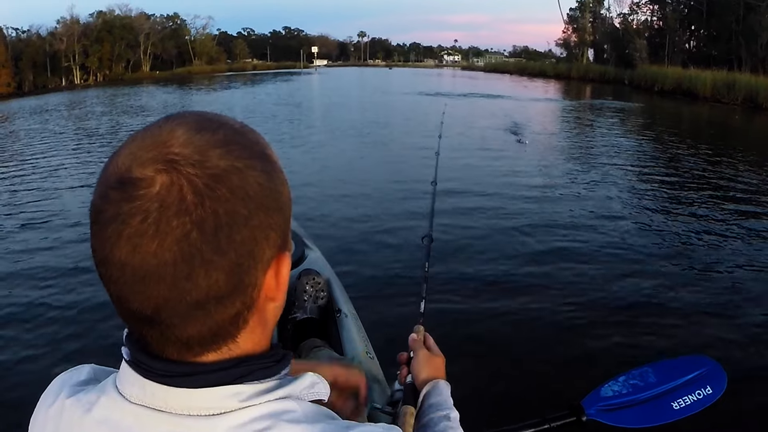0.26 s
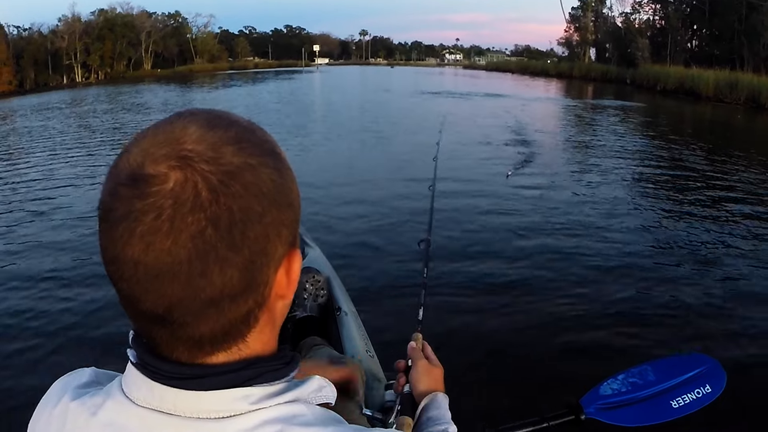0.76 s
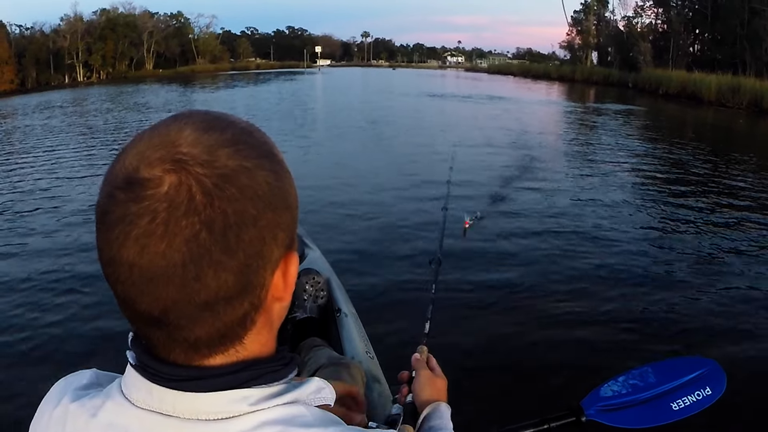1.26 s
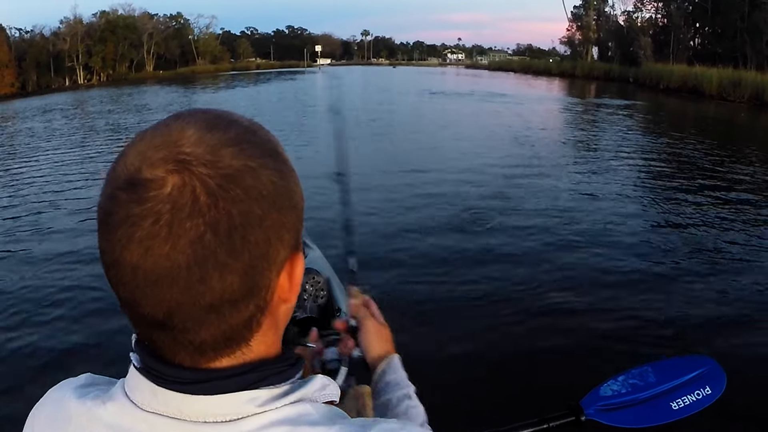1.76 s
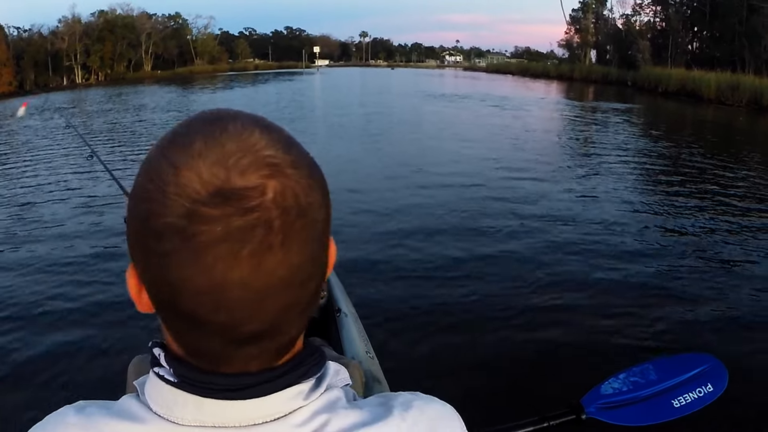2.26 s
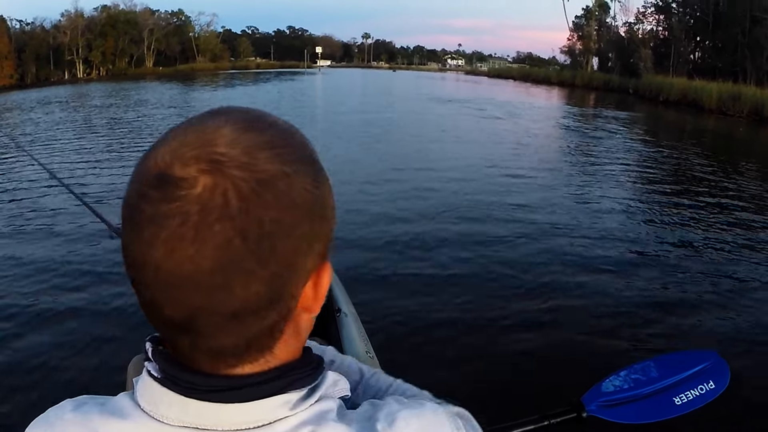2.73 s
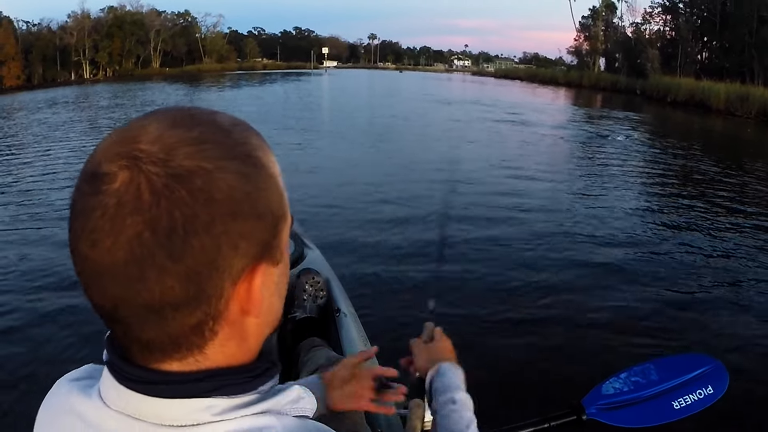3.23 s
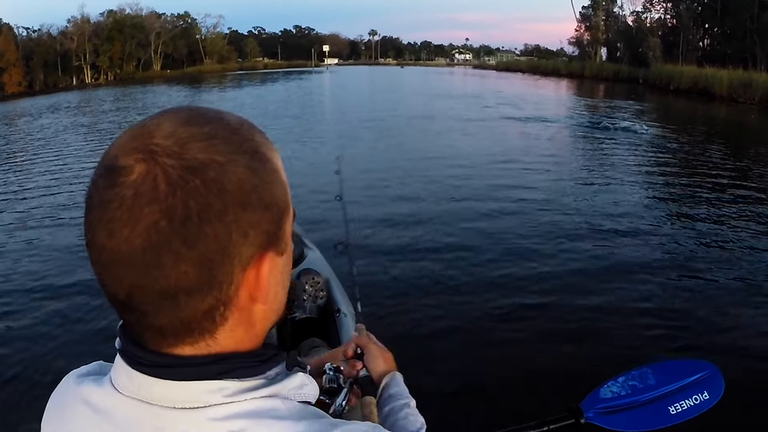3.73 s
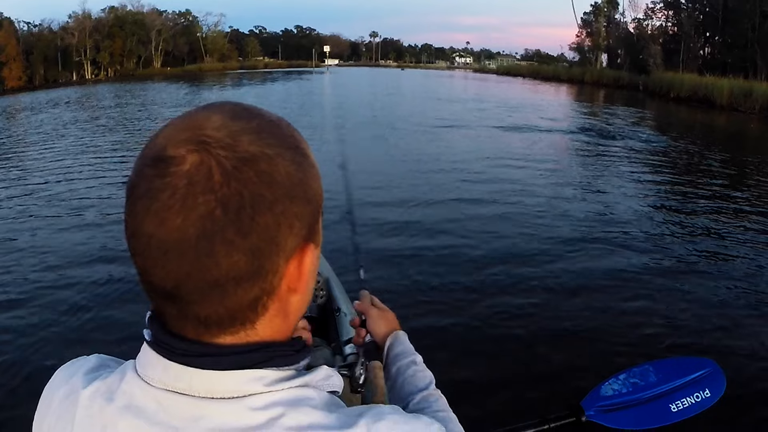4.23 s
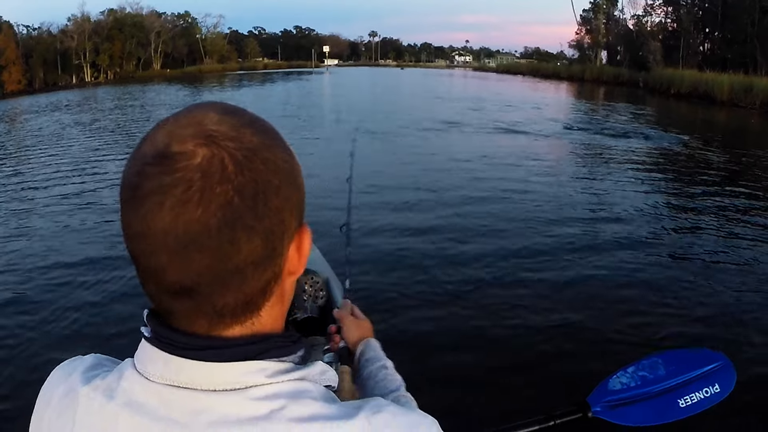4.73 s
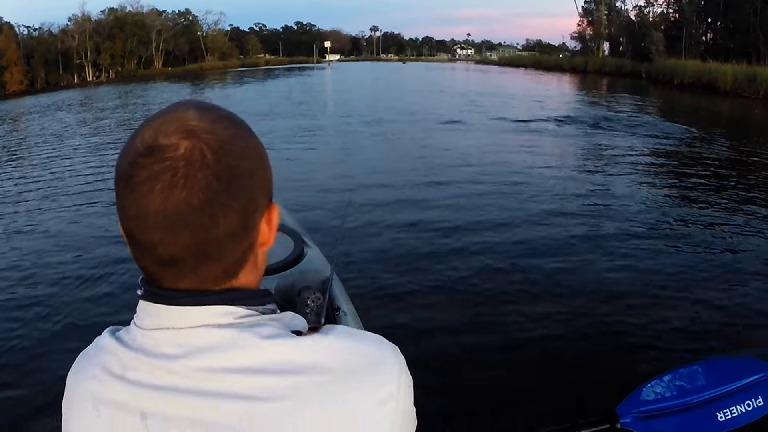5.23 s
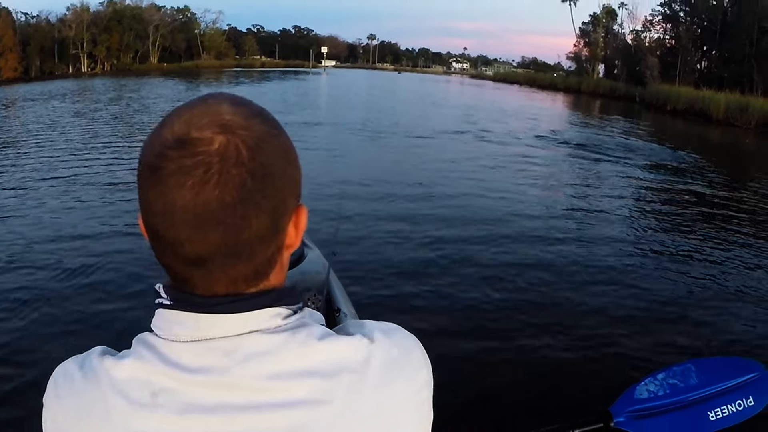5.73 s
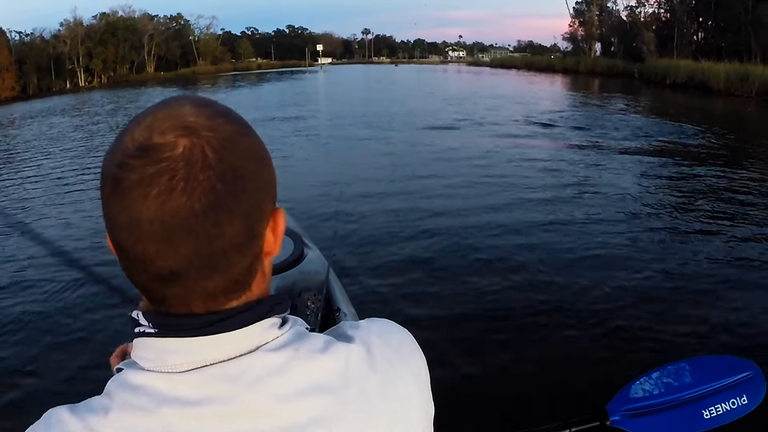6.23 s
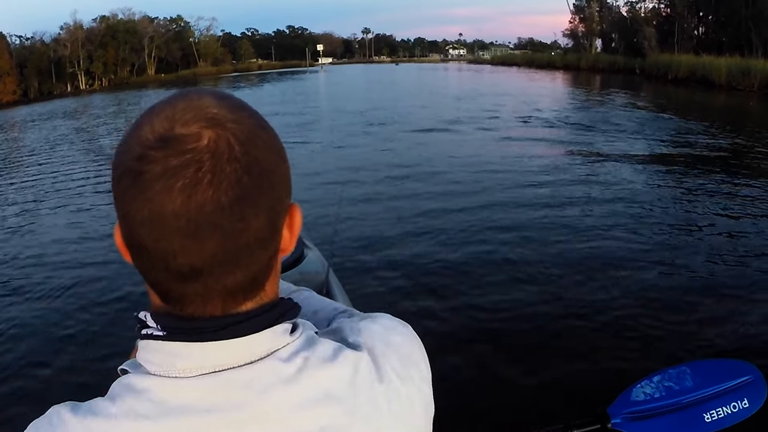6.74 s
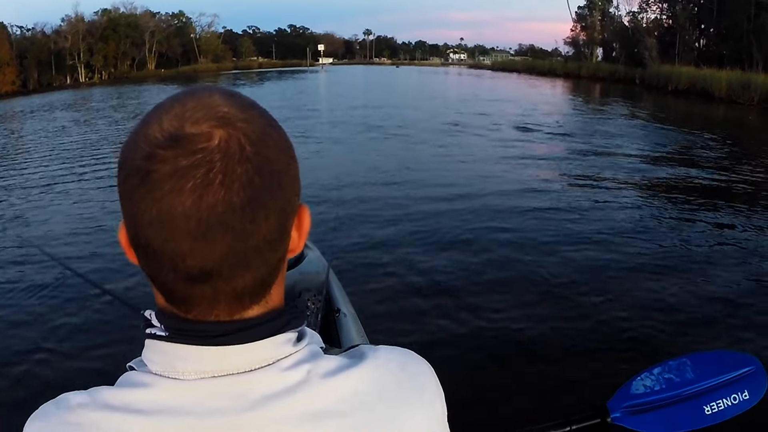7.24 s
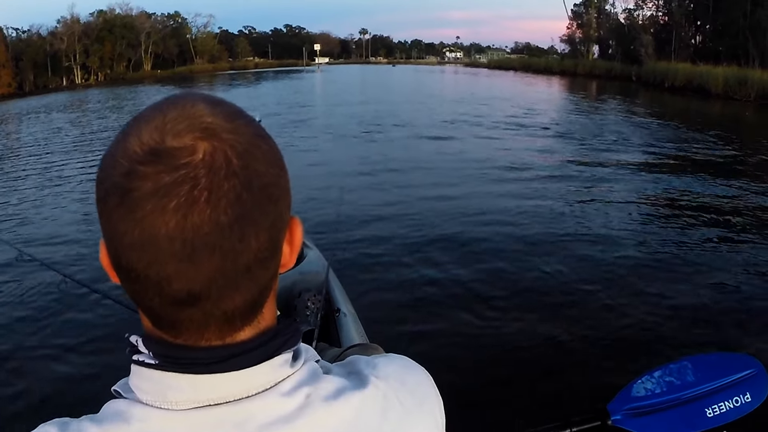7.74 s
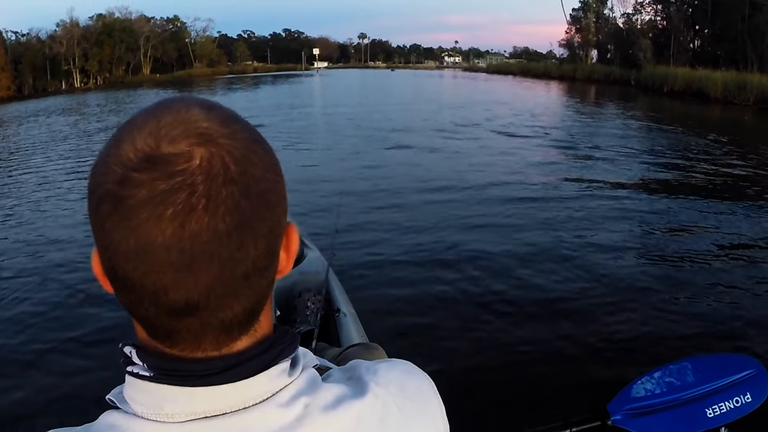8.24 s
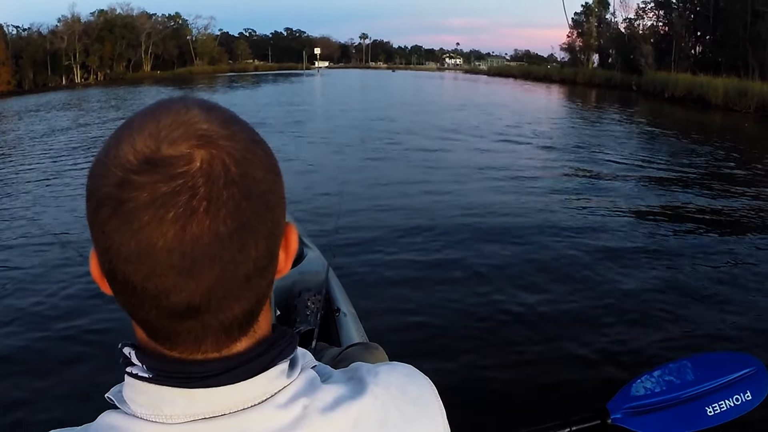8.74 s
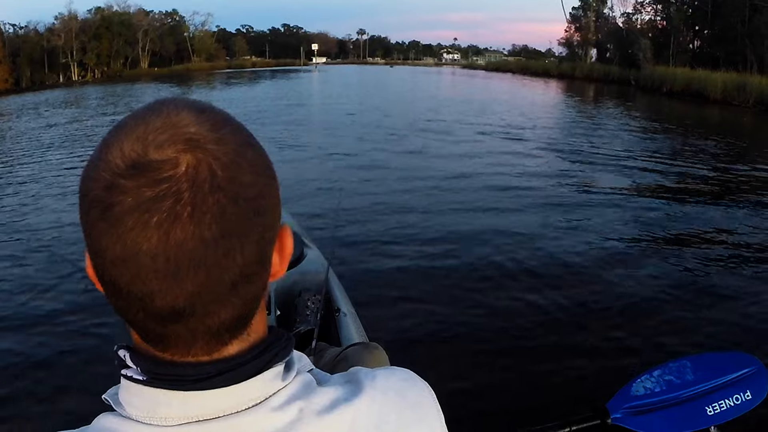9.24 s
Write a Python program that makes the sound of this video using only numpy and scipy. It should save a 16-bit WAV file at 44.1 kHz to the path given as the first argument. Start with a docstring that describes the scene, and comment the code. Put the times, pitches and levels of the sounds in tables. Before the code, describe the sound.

Soft bumps and three hard knocks boom through a plastic kayak hull while a fishing reel ticks faintly over low hiss.

```python
"""Fishing rod in a plastic kayak

On still water, heard close from a microphone in a closed housing fixed to the hull. Soft bumps and
three hard knocks travel through the hull and ring its low modes; the reel ticks and rasps faintly.
Under all lie the microphone's hiss, a faint regular pip and the thin song of an insect on the bank."""
import sys
import numpy as np
from scipy import signal
from scipy.fft import rfft, irfft
from scipy.io import wavfile

SR = 44100
rng = np.random.default_rng(int(sys.argv[2]) if len(sys.argv) > 2 else 0)


def to_wav(sig):
    """Store sig (one row per channel, or 1-D mono) as 16-bit WAV at the path in sys.argv[1].

    Samples outside -1..1 are clipped; the rate is SR.
    """
    pcm = np.clip(np.atleast_2d(sig), -1, 1) * 32767
    pcm = np.round(pcm).astype(np.int16)
    wavfile.write(sys.argv[1], SR, pcm.T)  # frames by channels


N = 418509
TIME = np.arange(N) / SR


def amp(db):
    """dB to gain."""
    return 10 ** (np.asarray(db) / 20)


def rms_one(x):
    """Scale to rms 1."""
    return x / np.sqrt(np.mean(x ** 2) + 1e-20)


def clicks(times, gains):
    """Single samples at given times."""
    out = np.full(N, 1e-18)
    np.add.at(out, np.clip(np.round(np.asarray(times) * SR).astype(int), 0, N - 1), gains)
    return out


def ring(x, hz, t60):
    """A unit click sets a sine of height 1 ringing."""
    r, w = amp(-60 / (t60 * SR)), 2 * np.pi * hz / SR
    return signal.lfilter([0, np.sin(w)], [1, -2 * r * np.cos(w), r * r], x)


def resonance(x, hz, width_hz, passes=1):
    """A peak of gain 1; more passes make a click swell before it dies."""
    r, w = np.exp(-np.pi * width_hz / SR), 2 * np.pi * hz / SR
    for _ in range(passes):
        x = signal.lfilter(np.array([1, 0, -1]) * (1 - r * r) / 2, [1, -2 * r * np.cos(w), r * r], x)
    return x


def flutter(hz, width_hz):
    """Random motion of rms 1 around a given rate."""
    return rms_one(resonance(rng.standard_normal(N), hz, width_hz))


def butter(x, order, hz, kind="band"):
    """Butterworth filter."""
    return signal.sosfilt(signal.butter(order, hz, kind, fs=SR, output="sos"), x)


def decay(x, t60):
    """Each click starts an exponential fade."""
    return signal.lfilter([1], [1, -amp(-60 / (t60 * SR))], x)


def soften(x, length_s):
    """A contact that lasts: a smooth hump of area 1."""
    hump = np.hanning(max(int(length_s * SR), 3))
    return np.convolve(x, hump / hump.sum())[:N]


def gate(start, end, edge_s):
    """On between two times, with soft edges."""
    return np.clip(np.minimum(TIME - start, end - TIME) / edge_s, 0, 1)


# Hard strikes of the rod butt, carried through the hull to the microphone:
# (time [s], level [dB], panel offset [dB], rattle offset [dB], crack offset [dB], panel pitch [Hz])
KNOCKS = [(3.2446, -8, 1.5, -35.5, -37.5, 283.4), (3.346, -46.5, 4, -13, -12, 271),
          (5.0486, -9, 1.5, -40, -37, 280.4), (5.3546, -12.5, -1.5, -52.5, -36, 281.4),
          (5.398, -42.5, 11, 2.5, -9, 302)]
SNAP_HZ, SNAP_WIDTH_HZ = 1866, 857
SETTLE_CYCLES, SETTLE_DB = 3.848, -12.5


def knocks():
    """The butt snaps on a panel and rings hull and mount, then drops back and stills the panel."""
    at, level_db, panel_db, rattle_db, crack_db, hz = np.transpose(KNOCKS)
    snap = resonance(clicks(at, amp(level_db)), SNAP_HZ, SNAP_WIDTH_HZ, passes=4)
    housing = mount(at, level_db)
    clatter = rattle(at, level_db + rattle_db) + crack(at, level_db + crack_db)
    struck = hull(at, level_db + panel_db, -16, hz, reach_hz=4.4, low_hz=89.9, far_db=21.5)
    stilled = hull(at + SETTLE_CYCLES / hz, level_db + panel_db + SETTLE_DB, -3, hz,
                   reach_hz=5.3, low_hz=90.5, far_db=26)
    return amp(35) * snap + amp(8.5) * housing + clatter - soften(struck - stilled, 0.002)


# Modes of the mount and housing, right at the microphone: (pitch [Hz], level [dB], t60 [s])
MOUNT_MODES = [(720, -24, 0.038), (965.4, -19.5, 0.029), (1067, -29, 0.036), (1570, -22, 0.0308),
               (1881, -37, 0.28), (2584, -29, 0.024), (2900, -27, 0.0258), (3420, -32.5, 0.01788),
               (4095, -41, 0.01603), (4700, -47, 0.016), (5440, -42.5, 0.02), (6450, -45, 0.0085),
               (1874, -30.5, 0.047)]
MOUNT_RINGS_S, MOUNT_DAMP_S, MOUNT_SCATTER_DB = 0.07, 0.04, 1.2


def mount(times, levels_db):
    """Each knock finds the mount's modes unevenly; they ring freely until a touch damps them."""
    age, out = np.arange(SR // 4) / SR, np.zeros(N)
    impulse = 1e-18 + (age == 0)
    damping = np.clip(1 + (MOUNT_RINGS_S - age) / MOUNT_DAMP_S, 0, 1)
    for at, level_db in zip(times, levels_db):
        strike_db = level_db + rng.normal(0, MOUNT_SCATTER_DB, len(MOUNT_MODES))
        ringing = sum(amp(strike_db[k] + db) * ring(impulse, hz, t60) * (-1) ** k
                      for k, (hz, db, t60) in enumerate(MOUNT_MODES))
        out[round(at * SR):][:len(age)] += ringing * damping
    return out


def rattle(times, levels_db):
    """Loose parts shake after a knock: lumpy noise that dies away."""
    lumps = amp(5 * flutter(152.5, 198))
    shaking = rms_one(butter(lumps * rng.standard_normal(N), 4, [420, 1950]))
    return shaking * decay(clicks(times, amp(levels_db)), t60=0.14)


def crack(times, levels_db, swell_s=0.0011, afterglow_db=-8):
    """The bright first contact of a knock and its dull afterglow."""
    contact, grit = clicks(times, amp(levels_db)), rng.standard_normal(N)
    age = np.arange(SR // 4) / SR / swell_s
    swell = signal.fftconvolve(contact, age * np.exp(1 - age))[:N]
    bright = rms_one(butter(grit, 1, [2600, 4500]))
    dull = rms_one(resonance(grit, 3000, 1200, passes=2))
    return swell * bright + amp(afterglow_db) * decay(contact, t60=0.12) * dull


# Soft bumps on the hull that holds the microphone:
# (time [s], level [dB], middle mode offset [dB], panel pitch [Hz])
BUMPS = [(0.128, -42.5, 2, 200), (0.309, -36, -7, 226), (0.69, -43, -22, 206), (1.245, -31.5, 1.5, 222),
         (1.674, -43.5, 2, 261), (3.059, -34.5, 1, 228), (3.077, -25, 1, 309), (3.205, -26, -6, 264),
         (3.689, -29.5, -15, 217), (4.034, -29, -17, 199), (4.092, -24.5, -18, 246),
         (4.193, -23.5, -18, 253), (4.369, -27, -9, 240), (4.468, -36, -4, 245), (4.759, -33, -4.5, 196.3),
         (4.81, -27, 1.5, 271), (4.828, -30.5, -8, 288), (4.879, -24, -6, 254), (4.964, -32, -16, 241),
         (4.977, -24.5, -19, 231), (5.003, -24, -7, 232), (5.217, -20.5, -25, 238), (5.24, -42, -19, 300),
         (5.345, -14.5, -0.5, 290), (5.397, -19, -8, 280), (5.407, -5.5, -22, 323),
         (5.445, -23.5, -20, 310), (5.477, -17, -19, 184), (5.655, -27, -10, 204), (5.685, -22, -12, 215),
         (5.776, -32.5, -8, 234), (5.82, -30.5, -2.5, 259), (5.94, -25, -19.5, 267),
         (5.982, -28.5, -45, 248), (6.468, -24.5, -13, 232), (6.647, -29, -23, 224),
         (6.799, -37, -10.5, 244), (7.06, -25.5, -29, 245), (7.113, -32, -28, 243),
         (7.638, -38.5, -22, 254), (7.674, -35.5, -21, 249), (7.736, -15, -36, 200),
         (7.787, -29.5, -5, 277), (7.857, -34, -6, 229), (8.167, -27.5, -22, 200), (8.239, -39, -10, 206)]
BOUNCE_S, BOUNCE_DB, BOUNCE_RISE_HZ = 0.023, -6.5, 29.5


def bumps():
    """Soft contacts of a few ms; each lands again a moment later on a stiffer, higher spot."""
    at, level_db, middle_db, hz = np.transpose(BUMPS)
    first = hull(at, level_db, middle_db, hz, reach_hz=8.15)
    again = hull(at + BOUNCE_S, level_db + BOUNCE_DB, middle_db - 9.5, hz + BOUNCE_RISE_HZ, reach_hz=8.6)
    return amp(-2.5) * soften(first + again, 0.0036)


# Panel modes and lower middle modes of the hull under the microphone: (pitch [Hz], level [dB], t60 [s])
PANEL_MODES = [(205, -2, 0.17), (241, -0.5, 0.13), (264, -6.5, 0.14), (286.1, 3.5, 0.087),
               (304.5, -4, 0.099), (360, -18.5, 0.14), (428, -9.5, 0.035)]
MIDDLE_MODES = [(124.6, 2, 0.098), (153.5, -9, 0.25)]


def hull(times, level_db, middle_db, struck_hz, reach_hz, low_hz=160, far_db=17):
    """Panel modes near the struck pitch ring loudest, far ones faintly; middle modes ring below."""
    panel = np.zeros(N)
    for hz, db, t60 in PANEL_MODES:
        loss_db = np.minimum(((hz - struck_hz) / reach_hz) ** 2, far_db)
        panel += ring(clicks(times, amp(level_db + db - loss_db)), hz, t60)
    middle = sum(ring(clicks(times, amp(level_db + middle_db + db)), hz, t60) * (-1) ** k
                 for k, (hz, db, t60) in enumerate(MIDDLE_MODES))
    return butter(panel, 2, [low_hz, 600]) + middle


# Weight shifts aboard that set the whole hull booming: (time [s], level [dB], time until damped [s])
WEIGHT_SHIFTS = [(0.0, -42.5, 0.018), (0.124, -39, 0.09), (0.311, -39.5, 0.17), (0.687, -41, 0.17),
                 (0.85, -43, 0.24), (1.252, -42, 0.1), (1.43, -48, .12), (1.585, -48, 0.091),
                 (1.672, -39.5, 0.072), (2.89, -49, 0.09), (2.995, -45.5, .04), (3.06, -29.5, 0.075),
                 (3.206, -29.5, 0.099), (3.279, -31, 0.15), (3.585, -45.5, 0.27), (4.029, -33.5, 0.13),
                 (4.199, -36.5, 0.2), (4.381, -41.5, 0.069), (4.44, -37.5, 0.17), (4.76, -38, 0.067),
                 (4.83, -31.5, 0.15), (4.979, -25.5, 0.053), (5.05, -31.5, 0.059), (5.215, -30.5, 0.097),
                 (5.351, -29.5, 0.07), (5.42, -32, 0.15), (5.655, -39, 0.097), (5.77, -37.5, 0.065),
                 (5.955, -34.5, 0.11), (6.475, -41, 0.15), (6.66, -41.5, 0.11), (6.81, -48.5, 0.076),
                 (7.062, -36, 0.17), (7.64, -45.5, .12), (7.77, -41, .3), (8.12, -50.5, 0.041),
                 (8.21, -54, 0.22)]
BOOM_HZ, BOOM_WANDER_HZ = 71.6, 9.7
BOOM_ATTACK_S, BOOM_FADE_DB_PER_S, BOOM_DAMP_S = 0.011, 81, 0.063


def boom():
    """The lowest hull mode wanders with the load; it swells and fades until a limb or water damps it."""
    pitch = BOOM_HZ + BOOM_WANDER_HZ * flutter(9.5, 38)
    level = np.zeros(N)
    for at, db, length in WEIGHT_SHIFTS:
        age = np.maximum(TIME - at, 0)
        shape = np.clip(np.minimum(age / BOOM_ATTACK_S, 1 + (length - age) / BOOM_DAMP_S), 0, 1)
        fade = amp(db - BOOM_FADE_DB_PER_S * np.minimum(age, 1))
        level = np.maximum(level, np.sin(np.pi / 2 * shape) ** 2 * fade)
    swing = np.sqrt(2) * level * np.sin(2 * np.pi * np.cumsum(pitch) / SR)
    return butter(swing, 2, 47, "high")


# Limbs and rod butt dragging on the panels, heard through the hull: (time [s], level [dB])
DRAG_LEVELS = [(0.0, -61.5), (2.54, -73.5), (3.04, -66), (3.2, -57.5), (3.62, -63.5), (4.76, -58.5),
               (4.94, -44.5), (5.23, -48), (5.6, -48.5), (6.08, -65), (7.58, -68.5), (7.77, -57),
               (8.56, -69), (8.7, -61), (9.49, -72.5)]


def drag():
    """Uneven friction keeps the panels murmuring between bumps."""
    at, level_db = np.transpose(DRAG_LEVELS)
    friction = rng.standard_normal(N)
    murmur = sum(amp(db) * ring(friction, hz, t60) * (-1) ** k
                 for k, (hz, db, t60) in enumerate(PANEL_MODES))
    return rms_one(murmur) * amp(np.interp(TIME, at, level_db) - 2.5)


# Reel, line and handling ticks, close by: (time [s], peak [dB], centre [Hz], broad part offset [dB])
TICKS = [(0.2374, -50.5, 2790, 9), (0.4853, -54, 2900, 4), (0.749, -54, 2680, 11), (0.963, -50.5, 2830, 2),
         (1.074, -50, 2820, -9), (1.087, -54, 2850, -3), (1.305, -51, 2750, -1), (1.305, -50, 6130, -6),
         (1.395, -54, 2680, -2), (1.496, -53, 2900, 4), (1.64, -51, 4700, -1), (1.643, -44.5, 3300, -4),
         (1.706, -54, 2800, -12), (2.0963, -51, 3140, -7), (2.2705, -61, 13500, 3), (2.3106, -58, 14000, 2),
         (2.4932, -62, 10600, 2), (2.8439, -60, 11100, 6), (2.9771, -54, 10500, 4),
         (3.0046, -55.5, 10500, 0), (3.108, -47, 2550, -2), (3.47, -55, 2530, -8),
         (3.82, -44.5, 2720, -2.5), (4.0944, -50, 1600, -12), (4.2146, -52, 2620, -1),
         (4.377, -50.5, 2830, 9), (5.032, -52, 1900, -9), (5.344, -34, 650, -25), (5.344, -42, 1500, -12),
         (5.402, -37, 490, -25), (6.3888, -57, 1800, -2), (7.059, -53.5, 1560, -10), (7.08, -52, 2700, 4),
         (7.081, -48, 1610, 8), (7.312, -57, 2900, 0), (7.315, -49.5, 1730, 3), (7.638, -53.5, 1600, 0)]
TICK_SWELL_S, TICK_WIDTH_HZ = 0.0036, 390   # swell of a 3 kHz tick; higher ones are quicker


def ticks():
    """Each tick is a few ms of noise that swells and dies: a pitched part and a broad part."""
    out, size = np.zeros(N), int(0.03 * SR)
    for at, peak_db, hz, broad_db in TICKS:
        age = np.arange(size) * np.sqrt(hz / 3000) / (TICK_SWELL_S * SR)
        burst = rng.standard_normal(size) * age * np.exp(-age)
        pitched = rms_one(resonance(burst, hz, TICK_WIDTH_HZ, passes=2))
        broad = rms_one(resonance(burst, hz, 2500, passes=2))
        tick = pitched + amp(broad_db) * broad
        out[round(at * SR):][:size] += amp(peak_db) * tick / np.abs(tick).max()
    return out


# The reel's wire bail snaps shut nearby: (time [s], level [dB], tilt below 3.3 kHz [dB/octave])
BAIL_TOUCHES = [(3.1221, -44.5, 5), (3.1312, -37.5, -3.5)]
# Its ringing: (pitch [Hz], level [dB], t60 [s])
BAIL_MODES = [(1730, -10.5, 0.11), (1990, -21, .05), (2723, -0.5, 0.042), (3350, -3, 0.028),
              (3670, -9.5, 0.038), (4760, -7, 0.016), (6100, -12, 0.024), (6900, -10, 0.017),
              (10500, -16, 0.018)]


def bail(chatter_s=0.012, scatter_db=2):
    """Two touches of wire on metal, the second harder and duller; each chatters on briefly."""
    at, level_db, tilt = np.transpose(BAIL_TOUCHES)
    out = np.zeros(N)
    for hz, db, t60 in BAIL_MODES:
        touch_db = level_db + tilt * np.log2(min(hz / 3300, 1)) + rng.normal(0, scatter_db, len(at))
        touch = clicks(at, amp(touch_db) * rng.choice([-1, 1], len(at)))
        chatter = soften(touch * np.sqrt(chatter_s * SR), chatter_s) * rng.choice([-1, 1], N)
        out += amp(db) * ring(soften(touch, 0.00012) + amp(-9.5) * chatter, hz, t60)
    return out


# The reel turning, faint inside the housing: (start [s], end [s], level [dB], pitch [Hz])
WINDING = [(0, 1.8, -71.5, 2830), (1.98, 2.22, -70, 3250), (3.4, 4.4, -73, 2830), (4.45, 4.95, -70, 2800)]


def rasp():
    """Gear teeth of the turning reel: clumps of uneven clicks in a short resonance."""
    clicks_per_s = 240 * amp(7 * flutter(5.6, 12) - 3)
    hits = rng.random(N) < clicks_per_s / SR
    strength = amp(3 * np.minimum(rng.exponential(1, N), 4))
    teeth = soften(hits * strength, 0.00032)
    return sum(amp(db) * gate(start, end, 0.029) * rms_one(ring(teeth, hz, t60=0.0045))
               for start, end, db, hz in WINDING)


# Small squeaks aboard: (time [s], length [s], start pitch [Hz], end pitch [Hz], level [dB])
SQUEAKS = [(7.93, 0.038, 2800, 2900, -59), (7.956, 0.081, 3100, 2680, -62.5),
           (8.218, 0.062, 2700, 2760, -66), (8.62, 0.066, 1620, 1790, -63), (9.12, 0.033, 1650, 1730, -64)]


def squeaks():
    """Brief rough, gliding tones of plastic rubbing on plastic; each swells and fades."""
    out, roughness = np.zeros(N), 0.8 * flutter(120, 242)
    for at, length, start_hz, end_hz, db in SQUEAKS:
        pitch = np.interp(TIME, [at, at + length], [start_hz, end_hz])
        tone = np.sin(2 * np.pi * np.cumsum(pitch) / SR + roughness)
        out += np.sqrt(2) * amp(db) * tone * gate(at, at + length, length / 2)
    return out


# An insect across the water on the bank, its chords and buzzes: (start [s], end [s], level [dB])
CHORD_SPANS = [(1.42, 1.51, -73), (7.975, 8.07, -73.5)]
BUZZ_SPANS = [(1.512, 1.89, -72), (4.2, 4.235, -69), (4.256, 4.287, -77), (4.54, 4.75, -78),
              (8.083, 8.273, -73.5), (8.307, 8.513, -74.5)]
# Partials of the chord: (multiple of the pitch, level [dB])
CHORD_PARTIALS = [(6, 0), (7, 2), (9, -6), (10, -11)]
# Bands of the buzz, and faint steady bands behind it: (centre [Hz], width [Hz], level [dB])
BUZZ_BANDS = [(7400, 1500, 0), (9700, 900, 0), (13300, 1100, -4)]
STEADY_BANDS = [(5060, 830, -78), (12680, 128, -94.5)]
# Runs of short blips of the buzz: (start [s], end [s], spacing [s])
STUTTERS = [(2.0, 2.9, .14), (3.08, 3.6, .075), (3.65, 4.1, .143), (4.17, 4.45, .07), (5.21, 6.6, .137),
            (8.55, 9.4, .137)]
CHORD_HZ, CHORD_RISE_HZ_PER_S = 1421, 200
PULSE_PAIRS_PER_S, BUZZ_DEPTH = 140, 0.55
BLIP_DB, BLIP_LENGTH_S, BLIP_JITTER_S = -73.5, 0.05, 0.013


def insect():
    """A thin rising chord, then a blurred buzz, then soft uneven blips of the same buzz."""
    noise, waver = rng.standard_normal(N), flutter(30, 61.3)

    def bands(table):
        return sum(amp(db) * rms_one(resonance(noise, hz, width, passes=2)) for hz, width, db in table)

    age = sum((TIME - start) * ((TIME > start) & (TIME < end)) for start, end, _ in CHORD_SPANS)
    phase = 2 * np.pi * np.cumsum(CHORD_HZ + CHORD_RISE_HZ_PER_S * age) / SR
    chord = sum(amp(db) * np.sin(multiple * phase + 0.43 * waver) for multiple, db in CHORD_PARTIALS)
    chord_level = sum(amp(db) * gate(start, end, 0.0027) for start, end, db in CHORD_SPANS)
    pulse_phase = 2 * np.pi * PULSE_PAIRS_PER_S * TIME + waver / 4
    pulses = 1 + BUZZ_DEPTH * (np.cos(pulse_phase) + np.cos(2 * pulse_phase))   # one strong, one weak
    buzz = rms_one(bands(BUZZ_BANDS) * pulses)
    buzz_level = sum(amp(db) * gate(start, end, 0.022) for start, end, db in BUZZ_SPANS)
    at = np.concatenate([np.arange(*run) for run in STUTTERS])
    at += BLIP_JITTER_S * rng.standard_normal(len(at)) - BLIP_LENGTH_S / 2
    heights = amp(BLIP_DB + rng.normal(0, 1.5, len(at)))
    blips = soften(clicks(at, heights * BLIP_LENGTH_S * SR / 2), BLIP_LENGTH_S)
    return chord * chord_level + buzz * (buzz_level + blips) + bands(STEADY_BANDS)


def pips(hz=5600, peak_db=-69, first_s=0.217, every_s=0.2502, length_s=0.02):
    """A faint pure pip four times a second."""
    beats = clicks(np.arange(first_s, N / SR, every_s), length_s * SR / 2)
    return amp(peak_db) * soften(beats, length_s) * np.sin(2 * np.pi * hz * TIME)


# The microphone's own noise floor: (frequency [Hz], relative density [dB])
HISS_SPECTRUM = [(12, -40), (20, -8.5), (47, -0.5), (81, 0), (104, -1.5), (137, -2.5), (208, -6.5),
                 (394, -10), (1310, -19), (2040, -21), (13200, -40), (15600, -36.5)]


def hiss(rms_db=-55):
    """Steady microphone noise, strongest in the bass."""
    hz, db = np.transpose(HISS_SPECTRUM)
    bins = np.maximum(np.fft.rfftfreq(N, 1 / SR), 1)
    colour = amp(np.interp(np.log(bins), np.log(hz), db))
    return amp(rms_db) * rms_one(irfft(rfft(rng.standard_normal(N)) * colour, N))


def scene():
    """Kayak, reel and bank all reach one microphone on the hull."""
    reel = ticks() + bail() + rasp()
    kayak = boom() + bumps() + drag() + knocks() + squeaks()
    return (kayak + reel + hiss() + insect() + pips())[None]


def record(dry):
    """The treble is cut steeply, 50 dB down from 15.4 kHz."""
    return signal.sosfilt(signal.cheby2(12, 50, 15400, fs=SR, output="sos"), dry)


dry = scene()
out = record(dry)
to_wav(out)
```